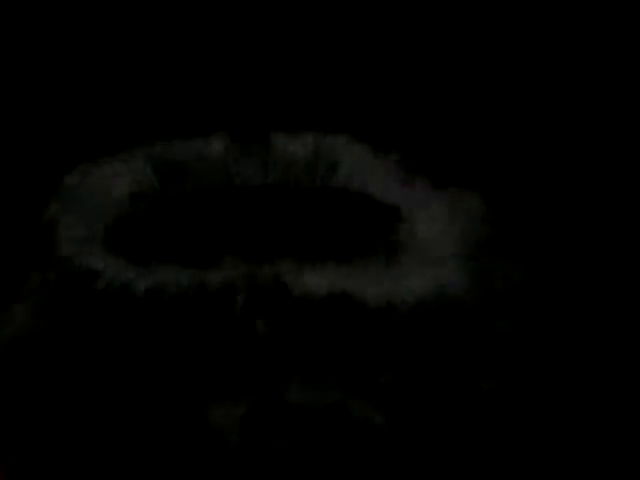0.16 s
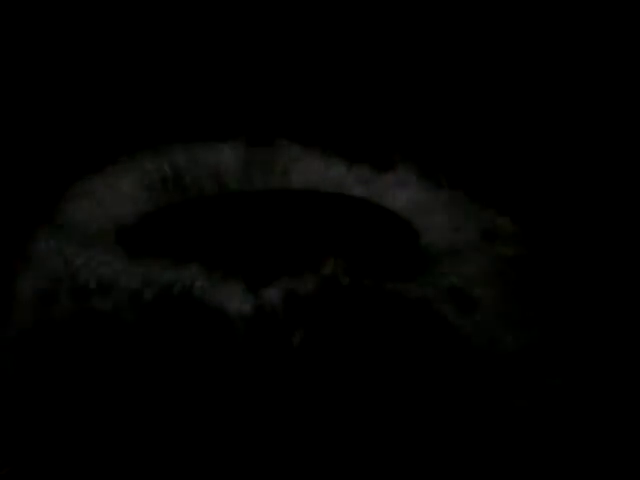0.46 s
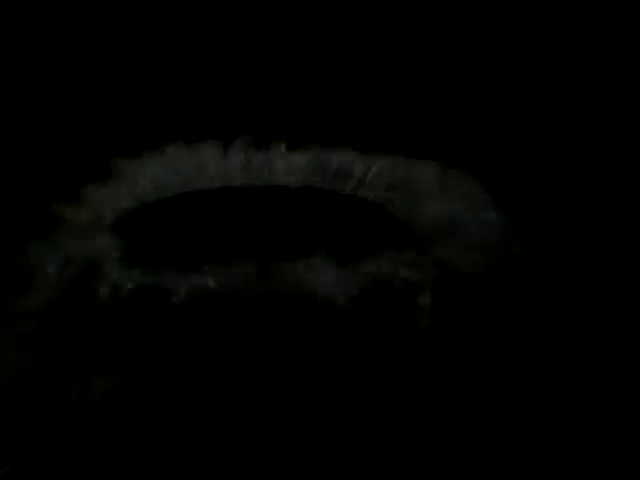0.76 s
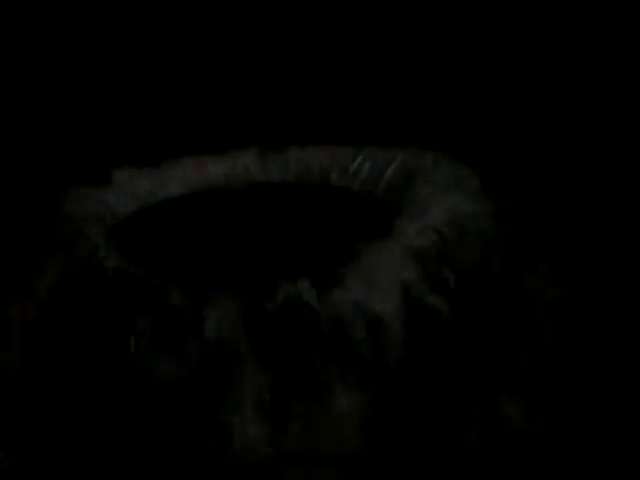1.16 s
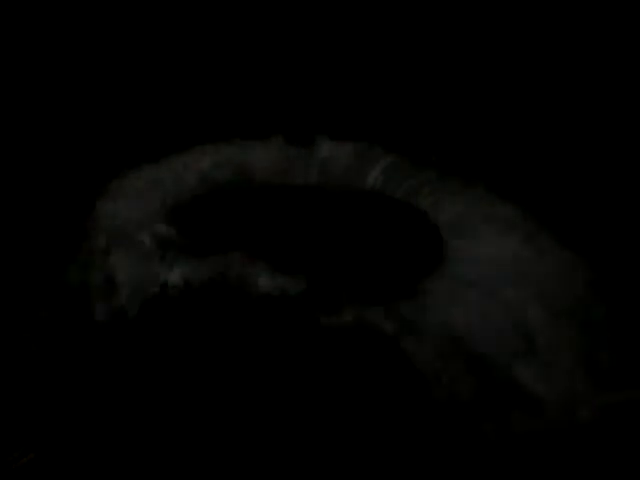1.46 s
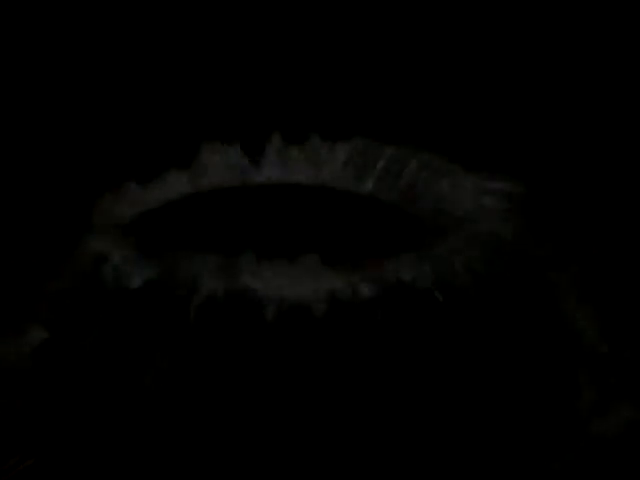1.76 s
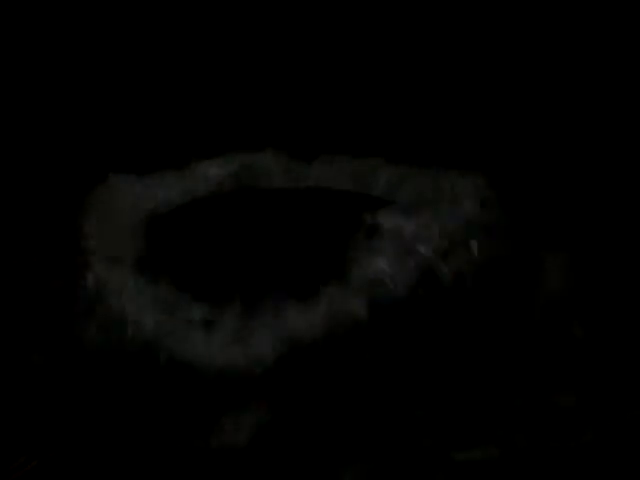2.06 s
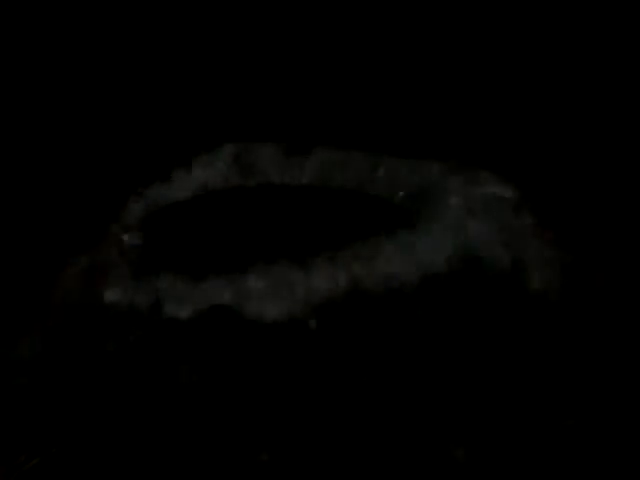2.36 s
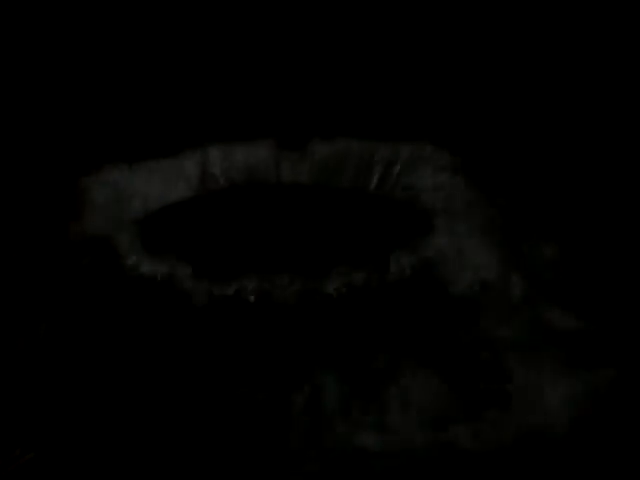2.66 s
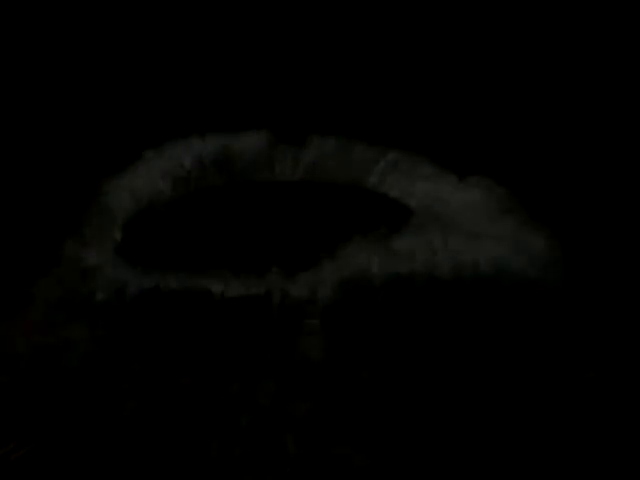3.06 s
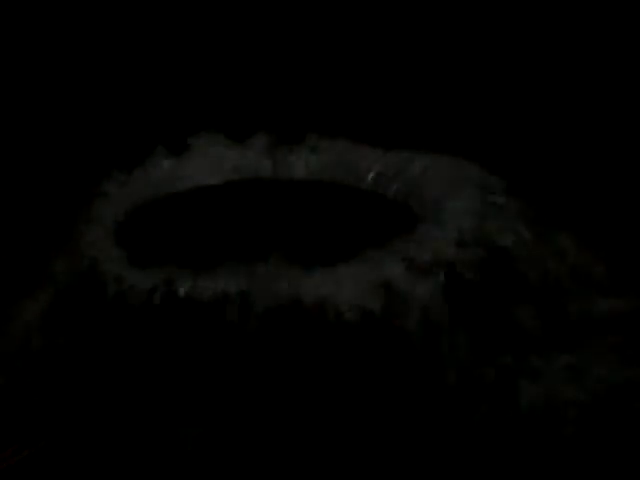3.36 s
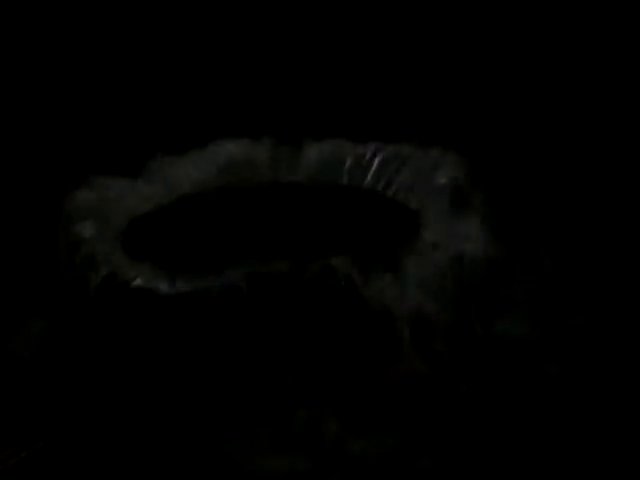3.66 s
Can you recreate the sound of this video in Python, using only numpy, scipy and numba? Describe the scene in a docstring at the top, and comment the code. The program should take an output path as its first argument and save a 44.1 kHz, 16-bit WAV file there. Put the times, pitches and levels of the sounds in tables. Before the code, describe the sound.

Water gushes from a manhole and splashes onto the street in restless surges, close to the microphone; drops smack, droplets tick, slabs slap, and hollow air gulps come now and then, strongest midway.

```python
"""Water wells up around a manhole cover and falls back on the street in uneven surges, over a low rumble.
From the start, clouds of short-lived bubbles make the slosh, the splash and the fine spray.
Soon single drops smack out of them, droplets tick, slabs of water slap down and large bubbles plop.
From half a second on, big air pockets now and then gulp under the cover and ring the shaft,
two of them strongest together midway; at the very end the surges sink."""
import sys
import numpy as np
from scipy import signal
from scipy.fft import rfft, irfft
from scipy.io import wavfile
from scipy.ndimage import map_coordinates
from numba import njit

SR = 44100
rng = np.random.default_rng(int(sys.argv[2]) if len(sys.argv) > 2 else 0)


def output_pcm(signal):
    """Save a mono or channel-first signal as 16-bit PCM at the path in sys.argv[1].

    Samples are clipped to [-1, 1] before scaling.
    """
    pcm = np.clip(np.atleast_2d(signal).T, -1, 1) * 32767
    wavfile.write(sys.argv[1], SR, np.round(pcm).astype(np.int16))


N = 167580


def undb(db):
    """Decibels to gain."""
    return 10 ** (np.asarray(db) / 20)


def unit(x):
    """Scale to rms 1."""
    return x / np.sqrt(np.mean(x ** 2))


def walk(rate):
    """Smooth random wander with rms 1, through `rate` random knots per second."""
    knots = rng.standard_normal(4096)
    return unit(map_coordinates(knots, [np.arange(N) / SR * rate], order=2, mode="mirror"))


def highpass(x, hz):
    """Steep cut of the lows."""
    return signal.sosfilt(signal.butter(3, hz, "highpass", fs=SR, output="sos"), x)


def colour(x, points):
    """Minimum-phase filter whose gain runs through (f/Hz, level/dB) points."""
    point_hz, point_db = np.array(points, float).T
    size = 4096
    hz = np.maximum(np.arange(size // 2 + 1) * SR / size, 1)
    gain_db = np.interp(np.log(hz), np.log(point_hz), point_db)
    # Folding the cepstrum onto positive time makes the filter causal
    cepstrum = irfft(np.log(undb(gain_db)))
    cepstrum[1:size // 2] *= 2
    cepstrum[size // 2 + 1:] = 0
    impulse = irfft(np.exp(rfft(cepstrum)))
    return signal.fftconvolve(x, impulse)[:N]


@njit
def ring(start, hz, size, t60, rise):
    """Sum of damped sines, each rising by the share `rise` of its pitch per second and cut at its t60."""
    out = np.zeros(N)
    for k in range(len(start)):
        w = 2 * np.pi * hz[k] / SR
        step = np.exp(1j * w - np.log(1000) / (t60[k] * SR))
        glide = np.exp(1j * w * rise[k] / SR)
        z = size[k] + 0j
        first = max(int(start[k] * SR), 0)
        for i in range(first, min(N, first + int(t60[k] * SR))):
            out[i] += z.imag
            z *= step
            step *= glide
    return out


# Colour of the falling water: f/Hz, level/dB (filter gain)
WATER_COLOUR = [(100, -8.5), (200, -12.5), (320, -11.5), (440, -5.5), (600, -8.5), (745, 1), (900, -2.5),
                (1120, 0), (1700, -7), (2200, -5.5), (2750, -4), (3900, -8), (5300, -8.5), (7000, -14),
                (8500, -17.5), (12000, -23.5), (14000, -24.5), (15700, -31)]
# Swarms of like-sized bubbles: spread of strength, changes per second, size classes in a cloud
SWARM_DB, SWARM_PER_S, SWARM_SIZES = 1.5, 45, 3.88


def cloud(lo_hz, hi_hz, per_s, cycles, scatter_db, glide, flutter_db, flutter_rate, wash_db):
    """Ringing bubbles of random size that come in clumps, over a noise wash of those too small to tell apart."""
    when, pitch, life, strength = rng.random((int(per_s * N / SR), 4)).T
    start = when * N / SR
    hz = lo_hz * (hi_hz / lo_hz) ** pitch
    t60 = cycles * 2 ** (2 * life - 1) / hz  # half to twice the given cycles
    rarity = -np.log(np.maximum(strength, .02))  # few bubbles are strong
    swarm_grid = rng.standard_normal((512, 16))  # time by size
    swarm = map_coordinates(swarm_grid, [start * SWARM_PER_S, pitch * SWARM_SIZES], order=1, mode="mirror")
    size = undb(scatter_db * rarity + SWARM_DB * swarm) * np.sqrt(hz / t60)
    bubbles = ring(start, hz, size, t60, glide / t60)
    band = signal.butter(3, [lo_hz, hi_hz], "bandpass", fs=SR, output="sos")
    wash = signal.sosfilt(band, rng.standard_normal(N))
    mix = unit(bubbles) + undb(wash_db) * unit(wash)
    water = colour(highpass(mix, lo_hz / 2), WATER_COLOUR)
    return unit(water * undb(flutter_db * walk(flutter_rate)))


# Surges of the overflow, before the trims below: t/s, splash level/dB, slosh level/dB, spray level/dB
SURGE_LEVELS = [(0.0, -28, -29, -36.5), (0.04, -26, -32.5, -35.5), (0.18, -27, -33, -38.5),
                (0.22, -26, -29, -34), (0.28, -24, -31, -37), (0.32, -29, -32, -40),
                (0.5, -25, -29.5, -34.5), (0.54, -26.5, -32.5, -37), (0.68, -24, -27.5, -34.5),
                (0.86, -26, -29, -37), (0.96, -26.5, -28, -34.5), (1.06, -26.5, -30, -39),
                (1.1, -22, -25, -32.5), (1.2, -25.5, -29, -35.8), (1.26, -23.5, -28, -35),
                (1.36, -27.5, -30, -38), (1.4, -24.5, -30.5, -34), (1.48, -22, -25.5, -32),
                (1.54, -27, -32, -37.5), (1.62, -24, -28.5, -35.5), (1.8, -27, -30, -37.0),
                (1.98, -24.5, -27.5, -35.5), (2.02, -26, -26, -37.5), (2.1, -22.5, -26.5, -32),
                (2.24, -25, -29, -36), (2.38, -25, -31, -34), (2.42, -24, -28.5, -33.5),
                (2.52, -23, -29, -34), (2.58, -23, -26.5, -34.5), (2.78, -31, -31, -40.5),
                (2.92, -26.5, -30.5, -38), (3.02, -24.5, -33, -34.5), (3.06, -27, -29.5, -37),
                (3.14, -28.5, -33.5, -38.5), (3.32, -25.5, -30.5, -35.5), (3.4, -26.5, -31, -37),
                (3.5, -25.5, -31.5, -35), (3.56, -25, -27.5, -36), (3.62, -28.5, -33, -38.5),
                (3.79, -31.2, -32, -42)]
# Trim of each kind of bubble on top of its surge level
SPLASH_DB, SLOSH_DB, SPRAY_DB, GURGLE_DB = -0.39, -2.04, 1.9, -18
PATTER_DB = -10.5  # separate drops, against the splash


def overflow():
    """Surges drive deep slosh, gurgle, bright splash, patter and spray; the water sheet breaks up unevenly."""
    t = np.arange(N) / SR
    rows = np.array(SURGE_LEVELS)
    splash_db, slosh_db, spray_db = (np.interp(t, rows[:, 0], col) for col in rows[:, 1:].T)
    slosh = cloud(lo_hz=382.6, hi_hz=1750, per_s=900, cycles=22.3, scatter_db=0.46,
                  glide=0.095, flutter_db=0.5, flutter_rate=15, wash_db=-5.5)
    splash = cloud(lo_hz=1757, hi_hz=7080, per_s=2800, cycles=19.5, scatter_db=1.27,
                   glide=0.18, flutter_db=0.71, flutter_rate=95, wash_db=-3)
    patter = cloud(lo_hz=1997, hi_hz=3740, per_s=130, cycles=19, scatter_db=0.0,
                   glide=0.12, flutter_db=1.5, flutter_rate=39, wash_db=-2)
    spray = cloud(lo_hz=7240, hi_hz=15700, per_s=2500, cycles=13.5, scatter_db=1.0,
                  glide=.05, flutter_db=1.0, flutter_rate=93, wash_db=-4.0)
    gurgle = cloud(lo_hz=153.3, hi_hz=420, per_s=200, cycles=20, scatter_db=1.5,
                   glide=0.23, flutter_db=2, flutter_rate=7.5, wash_db=-5)
    breakup = undb(0.55 * walk(80))
    bright = (splash + undb(PATTER_DB) * patter) * undb(splash_db + SPLASH_DB)
    bright += spray * undb(spray_db + SPRAY_DB)
    deep = (slosh * undb(SLOSH_DB) + gurgle * undb(GURGLE_DB)) * undb(slosh_db)
    return breakup * bright + deep


# Air pockets: t/s, f/Hz at the start, starting level/dB, life/s, share by which the pitch has risen at the burst
AIR_POCKETS = [(0.489, 214, -43, 0.026, 0.14), (1.024, 218, -32.5, 0.047, 0.28),
               (1.465, 212, -36, 0.019, .1), (1.892, 177, -27, 0.043, 0.34),
               (1.892, 371.6, -21.5, 0.046, 0.46), (2.02, 245, -29, 0.021, .1),
               (2.269, 200, -39, 0.018, .1), (2.394, 193, -36.5, .024, 0.03),
               (2.828, 218, -32.5, 0.051, 0.077), (3.097, 219, -29.5, 0.039, 0.13),
               (3.098, 330, -40, .033, 0.34), (3.357, 220, -35, 0.019, .1), (3.45, 165, -32.5, .047, 0.025),
               (3.517, 386, -31.5, 0.025, 0.16)]
GULP_FADE_DB = 10  # loss over the life of a pocket
WOBBLE_DB, WOBBLE_PER_S = 0.5, 130  # a pocket changes shape as it rises
# The push that opens each gulp: level and pitch ratio against the pocket's
THUD_DB, THUD_T60_S, THUD_RATIO = -0.5, 0.053, 1.3
SHAFT_HZ, SHAFT_T60_S, SHAFT_DB = 177.7, 0.98, -22.5  # air column in the shaft, level against the pocket's
GULP_LOW_HZ = 141  # the gulps radiate little below this


def gulps():
    """Air pockets open with a thud, hold their note, whoop upward and burst; they wake the shaft's air."""
    t, pockets = np.arange(N) / SR, np.zeros(N)
    wobble_db = WOBBLE_DB * walk(WOBBLE_PER_S)
    for at, hz, db, life, rise in AIR_POCKETS:
        age = np.clip((t - at) / life, 0, 2)  # 1 at the burst
        phase = 2 * np.pi * hz * life * (age + rise * age ** 4 / 4)  # pitch rises with age cubed
        burst = np.exp(-age ** 8)
        pockets += undb(db - GULP_FADE_DB * age + wobble_db) * burst * np.sin(phase)
    start, hz, db = np.array(AIR_POCKETS, float).T[:3].copy()
    same = np.ones(len(start))
    thuds = ring(start, hz * THUD_RATIO, undb(db + THUD_DB), THUD_T60_S * same, 0 * same)
    shaft = ring(start, SHAFT_HZ * same, undb(db + SHAFT_DB), SHAFT_T60_S * same, 0 * same)
    return highpass(pockets + thuds + shaft, GULP_LOW_HZ)


# Single drops that smack close by: t/s, f/Hz at the peak, peak level/dB
SMACKING_DROPS = [(.083, 2660, -13.5), (.427, 2760, -16), (0.496, 2770, -14.5), (1.014, 2530, -16),
                  (1.107, 2650, -15), (1.226, 2850, -16), (1.256, 2600, -11.5), (1.388, 3380, -15),
                  (1.978, 2230, -13.5), (2.035, 2770, -16), (2.487, 2860, -16), (2.991, 5200, -17),
                  (2.996, 5260, -16), (3.094, 2770, -15.5), (3.119, 2420, -19), (3.513, 2630, -19)]
DROP_PEAK_S, DROP_CHIRP = 0.001, .07  # swell time of a smack; share by which its pitch rises in that time


def drops():
    """Heavy drops land with a rising sine that swells and dies within a few milliseconds."""
    t, out = np.arange(N) / SR, np.zeros(N)
    for at, hz, db in SMACKING_DROPS:
        age = np.clip((t - at) / DROP_PEAK_S, 0, 10)  # 1 at the peak
        swell = (age * np.exp(1 - age)) ** 2
        cycles = hz * DROP_PEAK_S * age * (1 + DROP_CHIRP * (age / 2 - 1))
        out += undb(db) * swell * np.sin(2 * np.pi * cycles)
    return out


# Slabs of water that slap down: t/s of the middle, centre f/Hz, level/dB, length/s (Gaussian sigma)
WATER_SLABS = [(0.277, 1010, -27, 0.012), (1.145, 2700, -27, .012), (1.235, 2670, -31, 0.018),
               (1.628, 1120, -23.5, 0.0061), (2.545, 830, -28, 0.0099), (2.575, 810, -23.5, 0.0072),
               (2.992, 1060, -28, 0.013), (3.024, 1060, -23, 0.011)]
SLAP_WIDTH = 1.27  # ratio of band edge to centre


def slaps():
    """A slab of water hits the pool: a narrow band of noise swells and fades like a burst of like-sized bubbles."""
    t, out = np.arange(N) / SR, np.zeros(N)
    for at, hz, db, length in WATER_SLABS:
        band = signal.butter(2, [hz / SLAP_WIDTH, hz * SLAP_WIDTH], "bandpass", fs=SR, output="sos")
        noise = unit(signal.sosfilt(band, rng.standard_normal(N)))
        out += undb(db) * noise * np.exp(-.5 * ((t - at) / length) ** 2)
    return out


# Large bubbles: t/s, f/Hz at the start, starting level/dB
LARGE_BUBBLES = [(.813, 724, -30), (1.073, 530, -32), (1.499, 742, -23), (1.686, 1050, -18.5),
                 (2.934, 695, -25), (3.559, 468, -35)]
PLOP_CYCLES, PLOP_GLIDE = 48, 0.17  # starting-pitch cycles until silence, and share of pitch rise over them


def plops():
    """Single large bubbles ring out above the slosh as damped, rising sines."""
    start, hz, db = np.array(LARGE_BUBBLES, float).T.copy()
    t60 = PLOP_CYCLES / hz
    return ring(start, hz, undb(db), t60, PLOP_GLIDE / t60)


# Droplets that tick on the street: t/s, centre f/Hz, level/dB at the onset
STREET_TICKS = [(.272, 8500, -25), (.394, 9000, -31), (.599, 8000, -25), (1.526, 13000, -27),
                (1.883, 7500, -22), (1.985, 7600, -20), (2.532, 10000, -23), (2.916, 9500, -22),
                (3.078, 9400, -20.5), (3.557, 8500, -22.5)]
TICK_WIDTH_HZ, TICK_DECAY_S = 2000, .0026  # decay to 1/e


def ticks():
    """Flung droplets shatter on the street: band noise starts sharply and decays at once."""
    t, out = np.arange(N) / SR, np.zeros(N)
    for at, hz, db in STREET_TICKS:
        peak = signal.iirpeak(hz, hz / TICK_WIDTH_HZ, fs=SR)
        crack = unit(signal.lfilter(*peak, rng.standard_normal(N)))
        out += undb(db) * crack * (t >= at) * np.exp(-np.abs(t - at) / TICK_DECAY_S)
    return out


# Colour of the rumble: f/Hz, relative level/dB per Hz
RUMBLE_COLOUR = [(20, -3), (50, 1), (130, -8), (250, 2.5), (600, -34.5)]
# Heaving of the flow: t/s, level/dB
RUMBLE_HEAVE = [(0, -66), (.4, -67), (0.499, -47), (.6, -64), (1.4, -66), (1.501, -48), (1.58, -64),
                (1.91, -57), (2.36, -62), (2.46, -48), (2.55, -67), (3.8, -67)]


def flow_rumble():
    """Low noise of the flow, heaving up and down in level."""
    heave_db = np.interp(np.arange(N) / SR, *np.array(RUMBLE_HEAVE).T)
    return undb(heave_db) * unit(colour(rng.standard_normal(N), RUMBLE_COLOUR))


def scene():
    """The overflow with its gulps, drops, slaps, plops and ticks, over the low rumble of the flow."""
    return (overflow() + gulps() + drops() + slaps() + plops() + ticks() + flow_rumble())[None]


NOTCH_HZ, NOTCH_Q = 7710, 29
TOP_HZ = 15750


def record(dry):
    """One narrow notch in the treble, then a steep cut of the top."""
    notched = signal.lfilter(*signal.iirnotch(NOTCH_HZ, NOTCH_Q, fs=SR), dry)
    return signal.sosfilt(signal.ellip(12, .2, 80, TOP_HZ, fs=SR, output="sos"), notched)


dry = scene()
out = record(dry)
output_pcm(out)
```